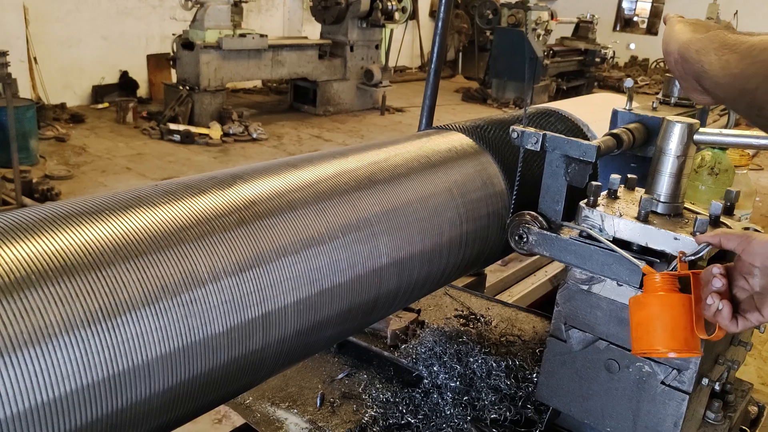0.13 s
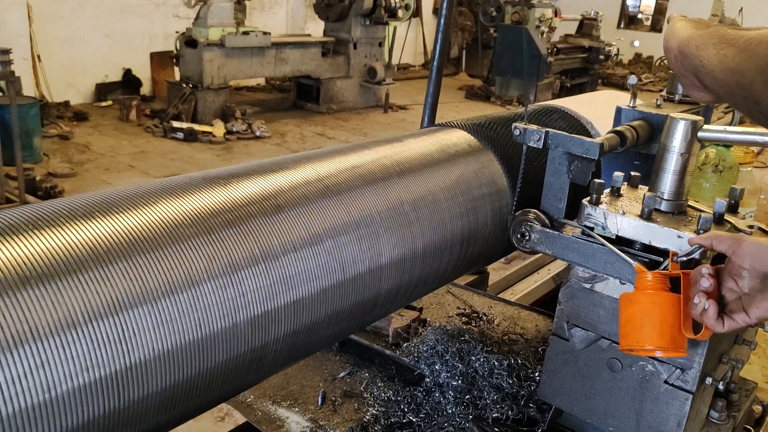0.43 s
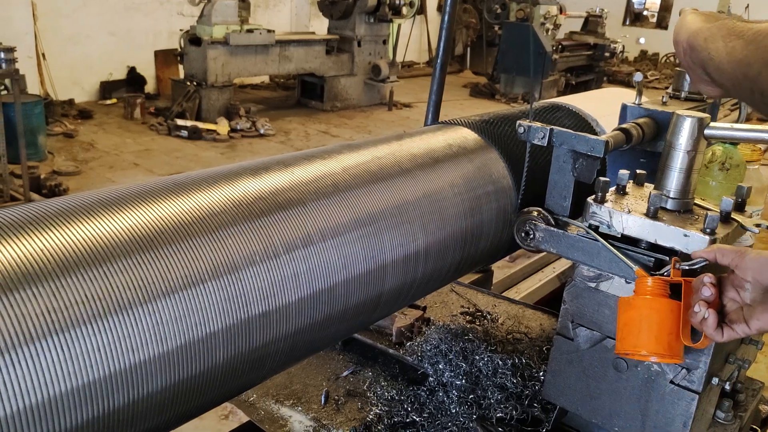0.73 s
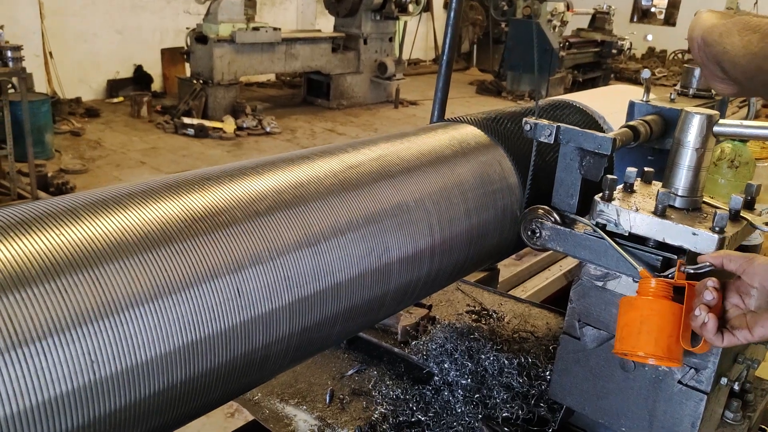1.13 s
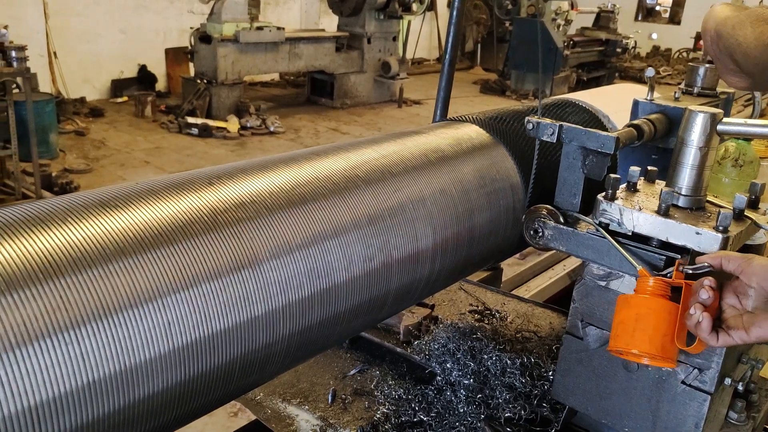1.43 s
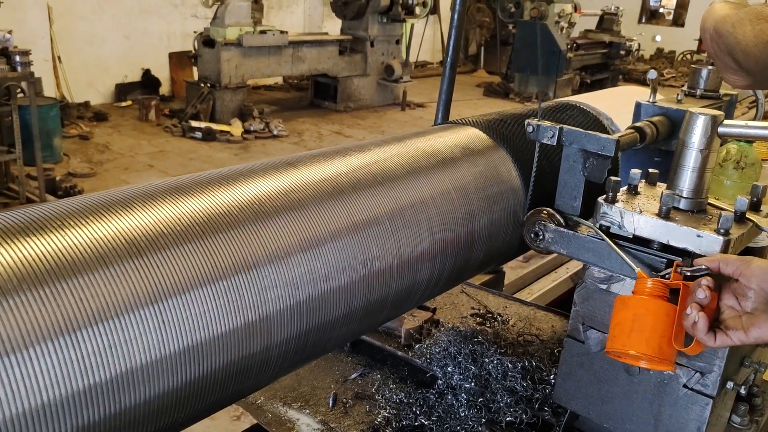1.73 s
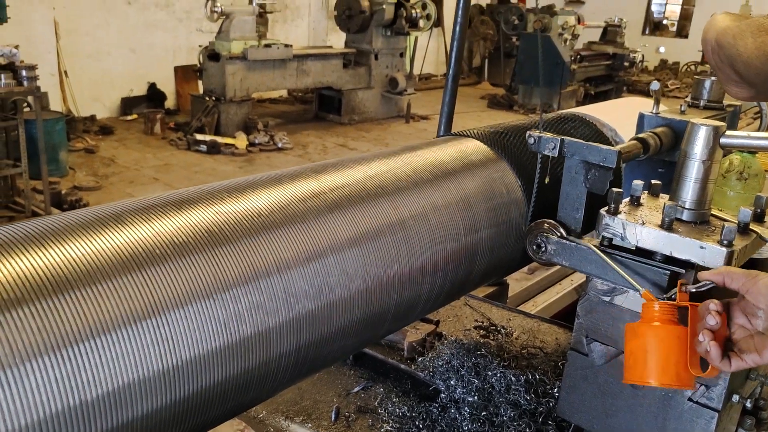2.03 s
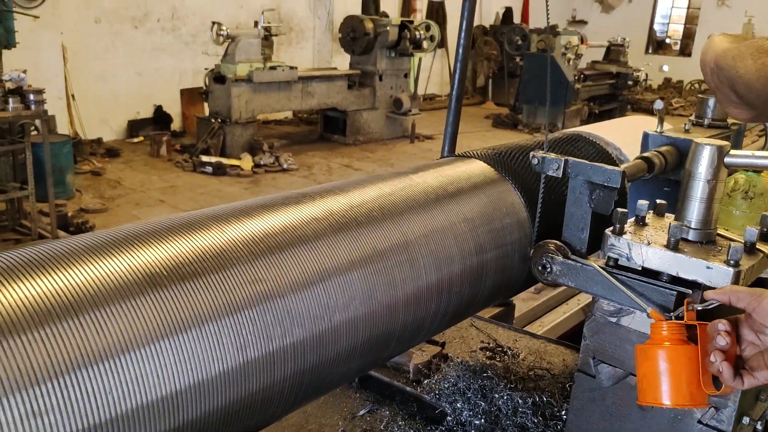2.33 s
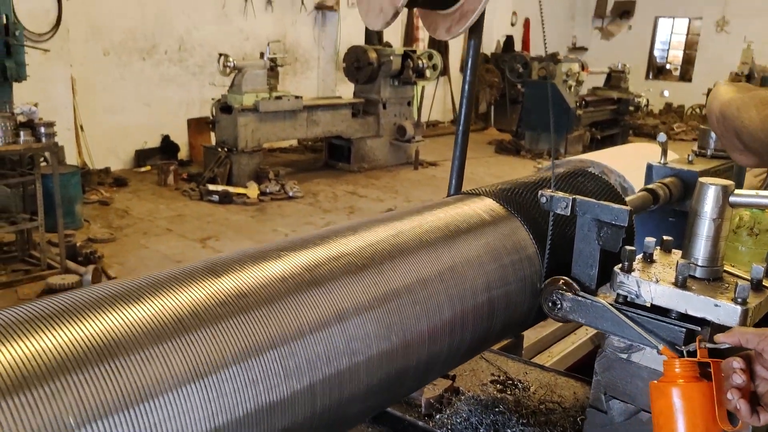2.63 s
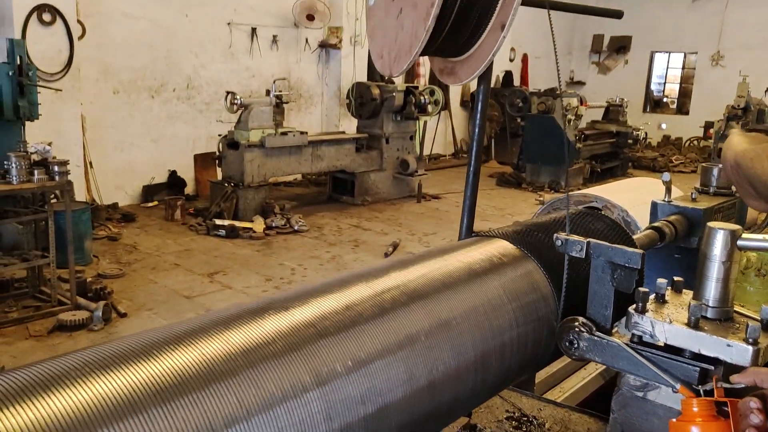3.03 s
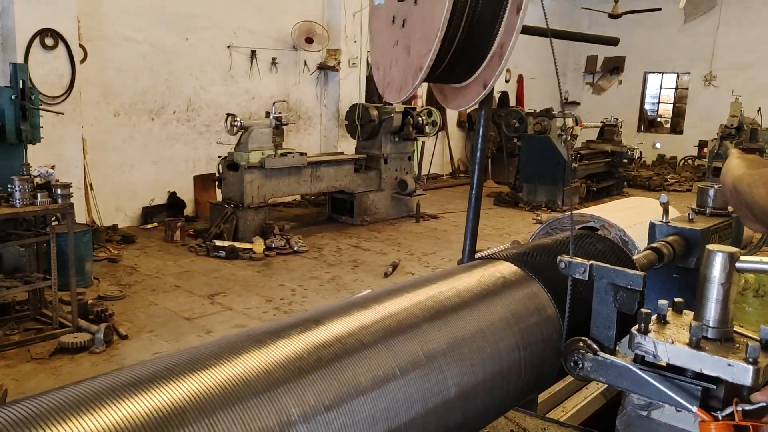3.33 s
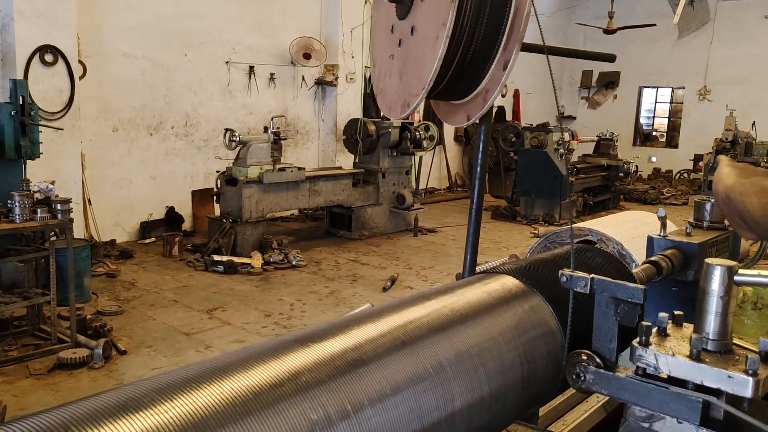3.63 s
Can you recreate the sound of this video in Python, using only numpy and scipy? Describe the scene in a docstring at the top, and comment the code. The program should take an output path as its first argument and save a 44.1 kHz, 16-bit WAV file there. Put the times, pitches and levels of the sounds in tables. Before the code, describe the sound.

A tool scrapes a big turning steel roller in rapid, ringing bites, pauses while small metal parts tick, then scrapes a few more times; steady low gear hum and rumble, echoing workshop, close stereo microphones.

```python
"""Tool scraping a steel roller

In a workshop a tool scrapes in bites against a large turning steel roller, which rings in many modes:
gritty noise, shaped by each bite, rasps directly and sets off fading sine tones.
A geared drive hums steadily over the noise rumble of the hall; small metal parts tick in the pauses.
Two microphones a hand apart hear it; the scraping force reaches the left one a little earlier."""
import sys
import numpy as np
from scipy import signal
from scipy.fft import rfft, irfft
from scipy.io import wavfile

SR = 44100
rng = np.random.default_rng(int(sys.argv[2]) if len(sys.argv) > 2 else 0)


def to_wav(s):
    """Save 16-bit WAV."""
    ch = np.atleast_2d(s).T  # columns
    pcm = np.round(np.clip(ch, -1, 1) * 32767)  # PCM
    wavfile.write(sys.argv[1], SR, pcm.astype(np.int16))


N = 167139  # length in samples
LEFT_LEADS = 18  # samples by which the scraping force reaches the left side first

# bites of the tool: (start [s], length [s], force [dB],
# extra on modes under 2 kHz [dB], extra on modes of 2-3 kHz [dB])
BITES = [(0.125, 0.11, 1, 3, 2), (0.26, 0.11, -0.5, 1.5, 2), (0.368, 0.053, 2.4, 0, 1.5),
         (0.442, 0.079, -1.5, -4.5, 1), (0.517, 0.13, 1.5, -3, 1.5), (0.64, 0.056, -0.5, 0.5, 2.5),
         (0.7, 0.037, -0.5, 1.5, 1), (0.8384, 0.01, 0.5, 1, -0.5), (0.8686, 0.07, -2, -1.5, -2),
         (0.951, 0.029, -5.5, 4.5, 9.5), (0.994, 0.054, -3, -1, 5), (1.102, 0.026, -7, -0.5, -9),
         (1.144, 0.03, -1, -0.6, 2.5), (1.235, 0.12, -2, 1.5, -0.5), (1.416, 0.1, -1.5, -1, -8),
         (1.529, 0.02, -2.5, 2, -10), (1.604, 0.047, -4.5, -0.5, 3), (1.712, 0.022, -7, -1.5, -7),
         (1.789, 0.007, -15.5, 2, -11), (2.354, 0.008, 2.5, -3.5, 3), (2.8127, 0.071, -0.5, 1.3, 4.5),
         (3.1147, 0.099, 0, -2.5, 4), (3.262, 0.043, -2, -2.5, 4.5), (3.6222, 0.017, 0.5, -3, -3),
         (3.655, 0.026, 1.5, -6, -8), (3.697, 0.021, 0.1, 0, 3.5)]
# how long the roller's modes ring: (frequency [Hz], time to fall by 60 dB [s])
RING_T60 = [(450, 0.73), (1300, 0.31), (2500, 0.3), (5000, 0.22), (15000, 0.18)]
# lean of the scrape to one side: (frequency [Hz], left minus right [dB])
SCRAPE_PAN = [(500, 3.5), (1200, 2), (3000, .5), (5000, .5), (8500, -5), (13000, -1)]


def amp(db):
    """Turns decibels into a factor."""
    return 10 ** (np.asarray(db) / 20)


def evened(x):
    """Scales a sound to an rms of 1."""
    return x / np.sqrt(np.mean(x ** 2) + 1e-20)


def read(points, hz):
    """Reads a table between its points, along a logarithmic frequency scale."""
    f, value = np.transpose(points)
    return np.interp(np.log(hz + 1), np.log(f + 1), value)


def coloured(x, points, pan=((1, 0), (2, 0))):
    """Filters a sound by a spectrum into two channels and leans them left or right."""
    hz = np.fft.rfftfreq(x.shape[-1], 1 / SR)
    lean_db = read(pan, hz) * np.array([[.5], [-.5]])
    return irfft(rfft(x) * amp(read(points, hz) + lean_db), x.shape[-1])


def wander(rate_hz):
    """Random drift of rms 1: noise with everything much faster than the rate filtered out."""
    lowpass = signal.butter(2, rate_hz, fs=SR, output="sos")
    return evened(signal.sosfilt(lowpass, rng.standard_normal(N)))


def turns(per_s, count=3):
    """Windows that take turns; their squares sum to 1, so the power stays even."""
    t = np.arange(N) / SR
    return [np.sqrt(2 / count) * np.cos(np.pi * (per_s * t + k / count)) for k in range(count)]


def force():
    """Gritty friction: each bite grips at once, sags, then lets go; as felt by all, low and middle modes."""
    attack_s, sag_db, release_db_per_s = 0.00073, -3, 350
    strike_db, strike_s = 7, 0.0051  # each bite lands with a short blow
    chatter_db, grit_db = 2.2, 1.6  # rms of the slower and the faster roughness
    shared = 0.65  # part of the force that both sides hear alike
    t, grip_power = np.arange(N) / SR, np.zeros((3, 1, N))
    for start, length, db, low_db, mid_db in BITES:
        u = t - start
        strike = strike_db * np.exp(-abs(u) / strike_s)
        sag = sag_db * np.clip(u / length, 0, 1)
        release = release_db_per_s * np.maximum(u - length, 0)
        attack = np.clip(u / attack_s, 0, 1)
        extra = amp([[[0]], [[low_db]], [[mid_db]]])
        grip_power += (attack * amp(db + strike + sag - release) * extra) ** 2
    roughness = amp(chatter_db * wander(113) + grit_db * wander(1550))
    left, other = rng.standard_normal((2, N)) * roughness
    right = shared * left + np.sqrt(1 - shared ** 2) * other
    both = np.array([left, np.roll(right, LEFT_LEADS)])
    return evened(both) * np.sqrt(grip_power)


def ring(hz, db, lead, t60, pan_db=0, size=SR // 2):
    """Response of a set of modes at the two microphones: sines that build up, then die away."""
    t = np.arange(size)[:, None] / SR
    rise = 1 - np.exp(-t * hz / 2.5)  # builds up over a few cycles
    fade = amp(db - 60 * t / t60) / np.sqrt(t60) * rise
    pan_db = pan_db + read(SCRAPE_PAN, hz)
    sides = []
    for side in (1, -1):  # left, right
        tones = np.sin(2 * np.pi * hz * t + side * lead / 2)
        sides.append((fade * amp(side * pan_db / 2) * tones).sum(1))
    return np.array(sides)


def rasp(push):
    """Bare rasp of the contact: the force itself, coloured."""
    # spectrum of the rasp: (frequency [Hz], relative level [dB])
    rasp_colour = [(400, -14), (1000, -24), (2000, -32), (3200, -13), (4500, -3), (7000, 0), (8200, -6),
                   (10000, -2), (15500, -8)]
    return amp(-39.5) * coloured(push, rasp_colour, SCRAPE_PAN)


def roller(push):
    """The strongest modes, set ringing by the force; as the roller turns, they wax and wane."""
    modes_db, turning_db = -27, 2  # common level, rms of the waxing and waning
    # strongest modes: (frequency [Hz], relative level [dB], phase by which the left leads [radians])
    modes = [(447, -3, 1.7), (529, -5, 1.7), (671, -7, -2.7), (857, -2, 1.8), (1095, -6, 2.7),
             (1224, 2, -2.8), (1260, 5, -2.0), (1296, 2, 2.3), (1349, 1, 2.8), (1621, -4, 2.8),
             (1925, -6, -2.2), (2099, -9, 2.5), (2368, -5, -1.5), (2402, -3, -1.3), (2416, -5, -1.4),
             (2470, -8, -1), (2572, -9, -.8), (3045, -10, 1.1), (3346, -8, 2.1), (3553, -8, -.6),
             (3834, 1, 1.1), (3868, -6, 1.1), (3935, -7, .7)]
    # level of the lone modes of .8-2 kHz, beside the cluster near 1.3 kHz: (time [s], extra level [dB])
    lone_level = [(.2, -2), (.9, 2.5), (2.4, 5), (2.85, -0.5), (3.15, 6), (3.7, 6)]
    hz, db, lead = np.transpose(modes)
    t60 = read(RING_T60, hz)
    lead = lead - 2 * np.pi * hz * LEFT_LEADS / SR  # the force already brings this part of the lead
    scale = amp(modes_db) / np.linalg.norm(ring(hz, db, lead, t60)[0])

    # bands: 0 from 3 kHz up, 1 under 2 kHz, 2 between, 3 lone modes
    band = np.where(hz < 2000, 1, np.where(hz < 3000, 2, 0))
    outside_cluster = (hz < 1200) | (hz > 1400)
    band[(band == 1) & (hz > 800) & outside_cluster] = 3
    lone_gain = amp(np.interp(np.arange(N) / SR, *np.transpose(lone_level)))
    push = [*push, push[1] * lone_gain]

    out = np.zeros((2, N))
    for k in range(8):  # each band in two halves that waver separately
        s = (band == k // 2) & (np.arange(len(hz)) % 2 == k % 2)
        wavering_push = push[k // 2] * amp(turning_db * wander(12))
        response = ring(hz[s], db[s], lead[s], t60[s])
        out += scale * signal.fftconvolve(wavering_push, response, axes=1)[:, :N]
    return out


def crowd(push):
    """Crowd of weaker modes at random pitches; three crowds take turns."""
    # spectrum of the crowd: (frequency [Hz], relative level [dB])
    crowd_colour = [(2200, -43), (2500, -9.5), (2900, -3), (3300, -4), (4000, -3), (5200, -5), (5700, 1.5),
                    (7400, -2.5), (8000, -6.5), (9300, -7.5), (9900, -2), (10600, -2), (11200, -6.5),
                    (13500, -7), (15500, -13)]
    count, crowd_db = 480, -27
    out = np.zeros((2, N))
    for window in turns(1.693):
        place, chance, side, phase = rng.random((count, 4)).T
        hz = 2200 + 13400 * (np.arange(count) + place) / count
        db = read(crowd_colour, hz) - 4 * np.log(chance + 0.048)  # a few modes stand out
        lead, pan_db = 3 * phase - 1.5, 8 * side - 4
        weak = ring(hz, db, lead, read(RING_T60, hz), pan_db, size=SR // 5)
        ringing = signal.fftconvolve(push * window, weak, axes=1)[:, :N]
        out += amp(crowd_db) / np.linalg.norm(weak[0]) * ringing
    return out


def scrape():
    """One friction force rasps directly and rings the strong and weak modes of the roller."""
    push = force()
    return rasp(push[0]) + roller(push) + crowd(push[0])


def singing():
    """Thin single tones that swell as a bite ends or in a pause, die slowly and are damped by the next bite."""
    # the singing tones: (time [s], frequency [Hz], level [dB],
    # phase by which the left leads [radians], time to fall by 60 dB [s])
    tones = [(2.9, 1409, -43, -1.2, 6), (3.3, 5580, -36, 1, 1.0), (3.53, 1411, -46, -1.2, 4)]
    rise_s = 0.025  # swelling and damping time
    t, out = np.arange(N) / SR, np.zeros((2, N))
    starts = np.array([row[0] for row in BITES] + [N / SR + 1])
    for s, hz, db, lead, t60 in tones:
        u = t - s
        left = starts[starts > s][0] + rise_s - t  # time left until fully damped
        swell = np.clip(np.minimum(u, left) / rise_s, 0, 1)
        level = swell * amp(db - 60 * np.maximum(u, 0) / t60 + 0.71 * wander(20))
        out += level * np.sin(2 * np.pi * hz * t + lead / 2 * np.array([[1], [-1]]))
    return out


def ticks():
    """Short bright noise bursts of small metal parts and one fuller knock, each dying away at once."""
    # ticks: (time [s], level before a common cut of 5 dB [dB], treble slope [dB per octave],
    # time to fall by 60 dB [s])
    tick_list = [(1.856, -21, 3, 0.029), (1.9477, -38, 5, 0.041), (2.0398, -33.5, 0.1, 0.032),
                 (2.0839, -24, 2, 0.028), (2.1293, -26.5, 0, 0.031), (2.1904, -34, 2, 0.039),
                 (2.2552, -35.5, 4, 0.033), (2.5043, -28, 0.1, 0.034)]
    # spectrum of a tick before its slope: (frequency [Hz], relative level [dB])
    tick_colour = [(500, -8), (900, 3), (3000, 7.5), (6000, 0.5), (8200, -3), (11000, -3), (15500, -13)]
    # spectrum of the knock: (frequency [Hz], relative level [dB])
    knock_colour = [(400, -23), (800, 3), (1200, 3), (2500, -6), (5000, 2.5), (8000, -14), (10500, -9),
                    (15000, -24)]
    size = 4096  # samples in a burst
    out, t = np.zeros((2, N + size)), np.arange(size) / SR
    bursts = [(2.4815, -22, knock_colour, 0.062)]  # the knock: s, dB, spectrum, fall by 60 dB in s
    for s, db, slope_db, t60 in tick_list:
        sloped = [(f, d + slope_db * np.log2(f / 4000)) for f, d in tick_colour]
        bursts.append((s, db - 5, sloped, t60))
    for s, db, colour, t60 in bursts:
        noise = rng.standard_normal((2, size))
        noise = evened(coloured(noise + noise[0], colour))  # the sides are partly alike
        at = round(s * SR)
        out[:, at:at + size] += noise * amp(db - 60 * t / t60) * np.minimum(t / 0.00096, 1)
    return out[:, :N]


def drive():
    """Gear-mesh hum: a few multiples of one steady tone, each wavering a little in level."""
    base_hz, waver_db = 91.07, 1.5
    # hum tones: (multiple of the base tone, level before a common lift of 3.5 dB [dB], left minus right [dB])
    hum_tones = [(1, -39, -1.1), (2, -37, -0.2), (3, -51, -2), (4, -54, 8)]
    # extra level of the two lowest tones: (time [s], first tone [dB], second tone [dB])
    hum_level = [(.19, -5.5, -0.5), (.5, -1.5, 1), (.9, -2.2, -1.5), (1.5, -2, -3), (2.2, -0.7, 0),
                 (3.1, -1.6, -2.5), (3.8, -1, -1.2)]
    t = np.arange(N) / SR
    phase = 2 * np.pi * (base_hz * t + 0.057 * wander(0.74))
    s, *levels = np.transpose(hum_level)
    out = np.zeros((2, N))
    for i, (k, db, pan_db) in enumerate(hum_tones):
        slow_db = np.interp(t, s, levels[i]) if i < 2 else 0
        fast_db = waver_db * (0.5 + i * 0.33) * wander(14.3)  # higher tones waver more
        tone = -np.sin(k * phase) * amp(db + 3.5 + slow_db + fast_db)
        out += tone * amp([[pan_db / 2], [-pan_db / 2]])
    return out


def rumble():
    """Steady noise of the hall with broad casing resonances; its bass is more alike on both sides."""
    # spectrum of the rumble: (frequency [Hz], relative level [dB])
    rumble_colour = [(12, -58), (20, -21), (81, -9.5), (107, -7), (134, -16), (182, -23), (228, -7.5),
                     (367, -11.5), (410, -7.5), (590, -8), (923, -16.5), (1220, -13), (2140, -20.5),
                     (6360, -26.5), (8410, -35), (14300, -38), (16000, -48)]
    # casing resonances: (frequency [Hz], width [Hz], height over the rumble [dB])
    casing = [(59, 14, 8), (207, 26, 7), (540, 22, -2), (583, 20.4, 9.5)]
    # likeness of left and right: (frequency [Hz], share from 0 to 1)
    likeness = [(30, 0.54), (100, 1), (300, 0.53), (800, 0.048), (3000, 0.025)]
    # lean to one side: (frequency [Hz], left minus right [dB])
    rumble_pan = [(30, 3), (300, 2.4), (1200, 1.6), (3000, -.5), (8000, -4), (13000, -1.5)]
    hz = np.fft.rfftfreq(N, 1 / SR)
    left, other = rfft(rng.standard_normal((2, N)))
    same = read(likeness, hz)
    right = same * left + np.sqrt(1 - same ** 2) * other
    power = 1
    for f, width, db in casing:
        power = power + amp(db) ** 2 / (1 + ((hz - f) / (width / 2)) ** 2) ** 2
    both = irfft(np.array([left, right]) * np.sqrt(power), N)
    return amp(-38 + 0.81 * wander(2.35)) * evened(coloured(both, rumble_colour, rumble_pan))


def hall(x):
    """Echo of sparse taps of random sign, each band dying at its own speed; three tails take turns."""
    # how long the hall echoes: (frequency [Hz], time to fall by 60 dB [s])
    hall_t60 = [(500, 1.66), (1500, 1.14), (4000, 0.91), (8000, 0.75), (15000, 0.24)]
    out, at = 0, np.arange(300, SR - 20, 20)  # one tap in every 20 samples
    for window in turns(1.343):
        places = at + rng.integers(0, 20, (2, len(at)))
        signs = rng.choice([-1., 1.], (2, len(at)))
        taps = np.zeros((2, SR))
        np.put_along_axis(taps, places, signs, 1)
        hz, t, z = signal.stft(taps, SR, nperseg=256)
        fade = amp(-60 * t / read(hall_t60, hz)[:, None])
        tail = signal.istft(z * fade, SR, nperseg=256)[1]
        tail = tail / np.linalg.norm(tail[0])
        out = out + signal.fftconvolve(x * window, tail, axes=1)[:, :N]
    return amp(-7) * out


def scene():
    """The near sounds with their echo, over the hum and the rumble."""
    near = scrape() + ticks() + singing()
    return near + hall(near) + drive() + rumble()


def record(dry):
    """Silence until the start, the deep bass swells in, then the band limit."""
    start_s, edge_hz = .187, 15450  # the sound sets in; top of the band
    bass_hz, bass_start_db, bass_fade_in_s = 75, -27, 0.62
    t = np.arange(N) / SR - start_s
    low = signal.sosfiltfilt(signal.butter(3, bass_hz, fs=SR, output="sos"), dry)
    bass_gain = amp(bass_start_db * np.clip(1 - t / bass_fade_in_s, 0, 1))
    dry = dry - low + low * bass_gain
    onset = np.clip(t / 0.002, 0, 1)
    dry = signal.sosfilt(signal.butter(2, 22, "high", fs=SR, output="sos"), dry * onset)
    band_limit = signal.firwin(301, edge_hz, window=("kaiser", 7), fs=SR)
    return signal.oaconvolve(dry, band_limit[None], "same")


dry = scene()
out = record(dry)
to_wav(out)
```